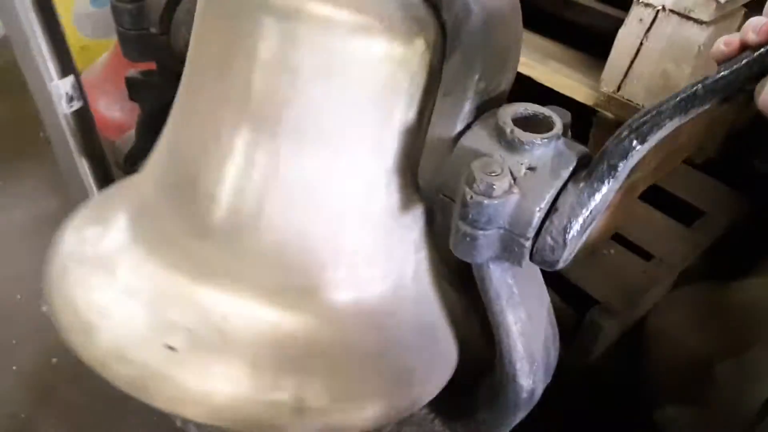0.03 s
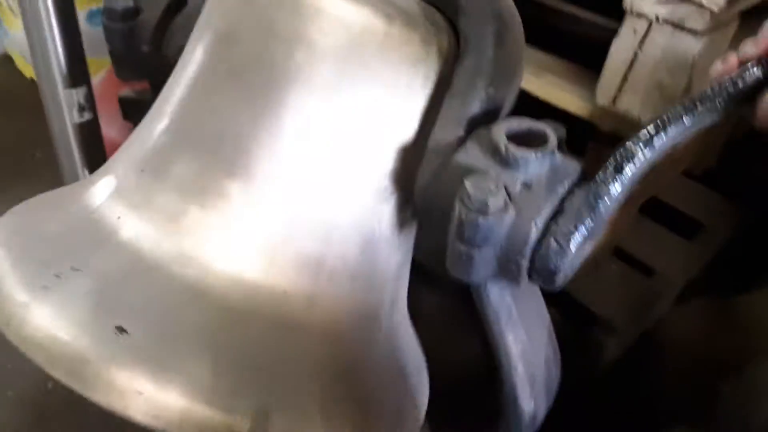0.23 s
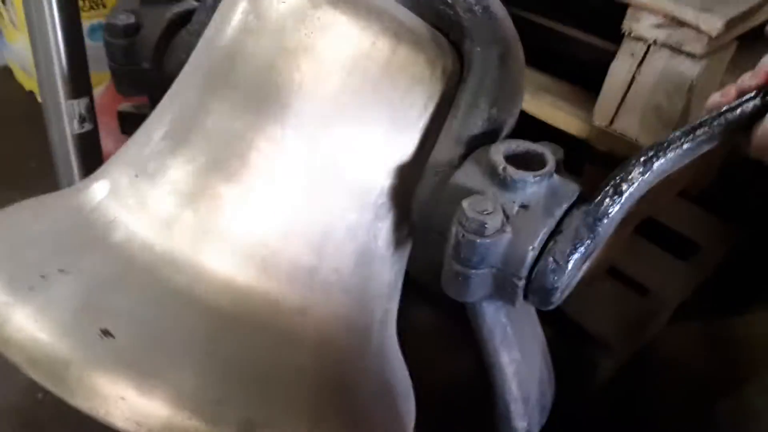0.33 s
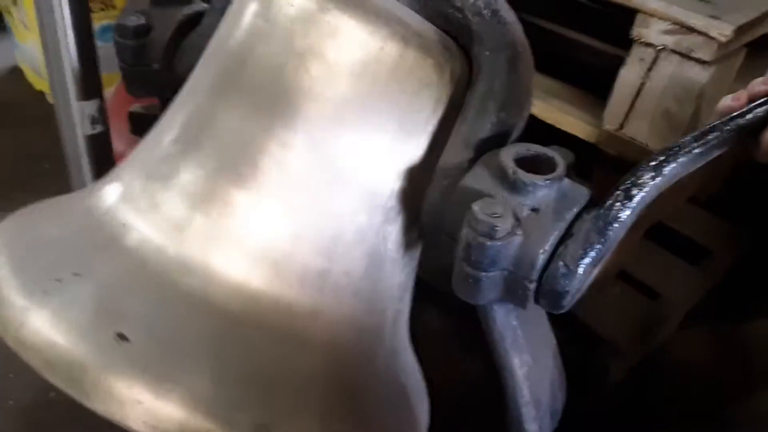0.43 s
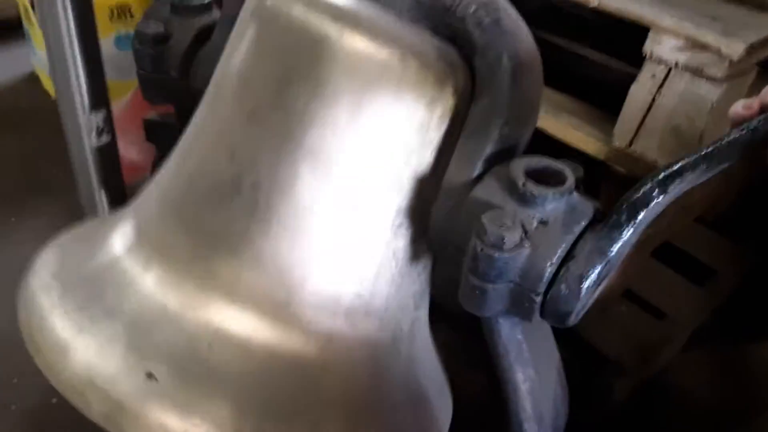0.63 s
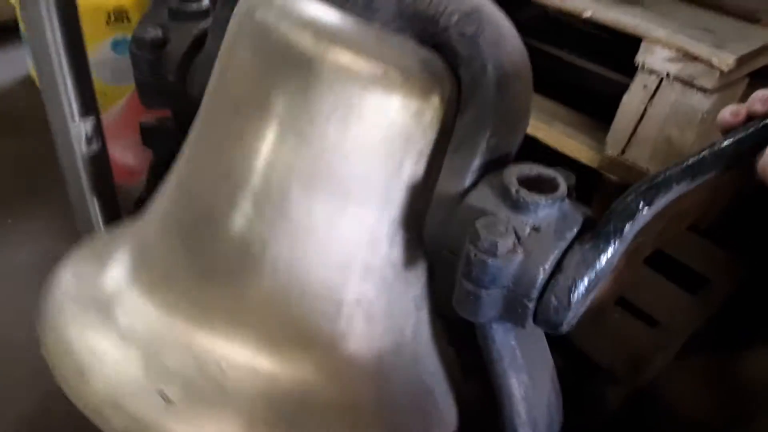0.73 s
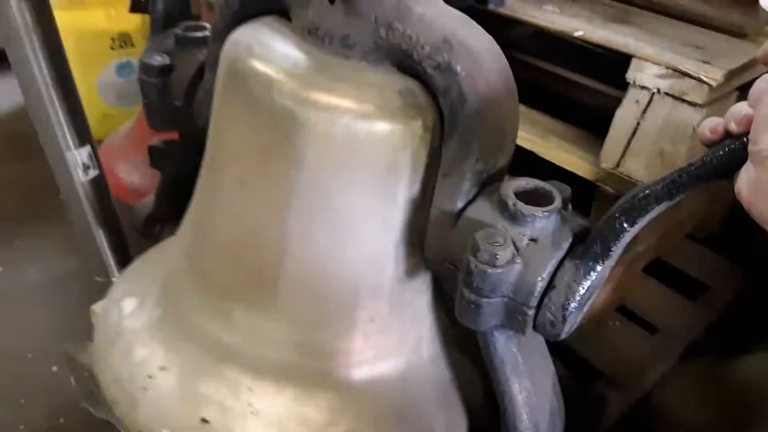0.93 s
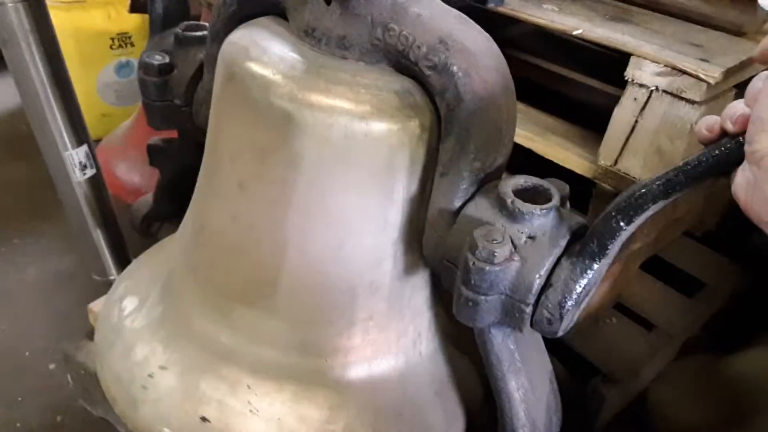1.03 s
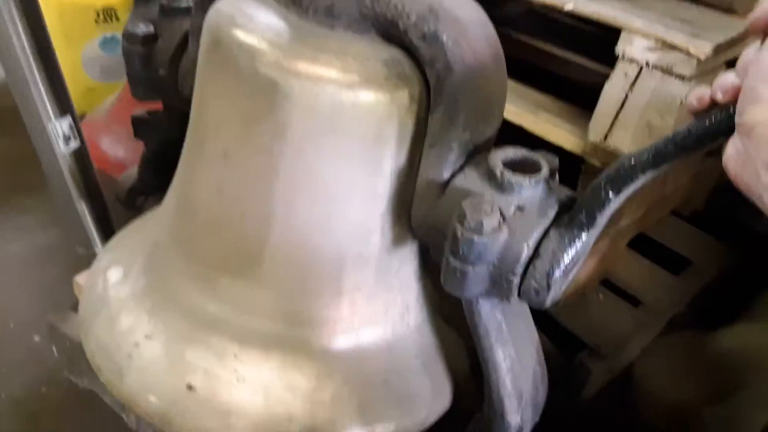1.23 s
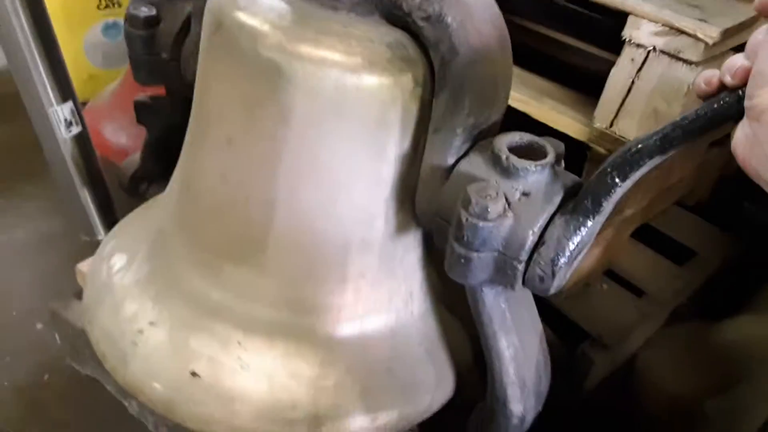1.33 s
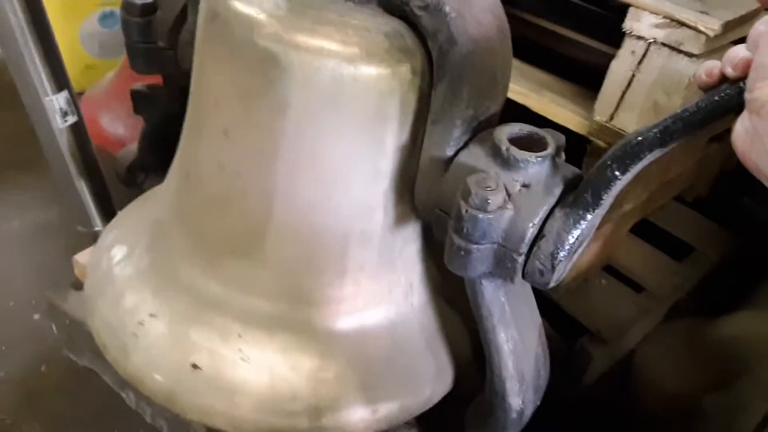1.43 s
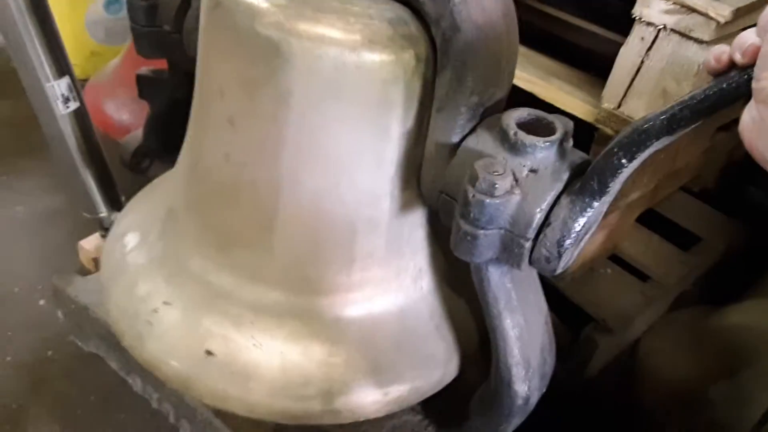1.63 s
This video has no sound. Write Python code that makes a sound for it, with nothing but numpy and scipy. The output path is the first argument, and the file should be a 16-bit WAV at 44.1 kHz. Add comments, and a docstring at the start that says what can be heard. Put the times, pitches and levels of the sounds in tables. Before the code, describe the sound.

A heavy brass bell is struck twice up close, ringing loudly with slowly beating metallic tones

```python
"""A brass bell rings twice, close by, with slow beats in its split partials and soft knocks after the second blow.
It swings in its yoke in a workshop: decaying partials beat, and the low ones swell as the mouth tilts up.
Each clapper blow adds a crack, a dense clang and a thud of the stand, all shaped from coloured noise.
A hand steadies the bell and the mount knocks softly, over a bed of workshop noise.
The first blow pulls the recorder's gain down and overloads the left channel."""
import sys
import numpy as np
from scipy import signal
from scipy.fft import rfft, irfft
from scipy.io import wavfile
from scipy.ndimage import uniform_filter1d, minimum_filter1d

SR = 44100
rng = np.random.default_rng(int(sys.argv[2]) if len(sys.argv) > 2 else 0)


def log_audio(samples):
    """Write samples as a 16-bit WAV file to the path given in sys.argv[1]."""
    # one column per channel
    frames = np.atleast_2d(samples).T
    # limit to full scale, then quantise
    limited = np.clip(frames, -1, 1)
    pcm = np.round(limited * 32767).astype(np.int16)
    wavfile.write(sys.argv[1], SR, pcm)


N = 74970
T = np.arange(N) / SR  # seconds
FREQS = np.fft.rfftfreq(N, 1 / SR)  # Hz


def amp(db):
    """Logarithmic level: 20 dB is a factor of ten in amplitude."""
    return 10 ** (np.asarray(db) / 20)


def read_log_hz(points, hz):
    """Logarithmic frequency scale: interpolates a table evenly per octave."""
    table_hz, value = np.transpose(points)
    return np.interp(np.log(hz + 1), np.log(table_hz + 1), value)


def read_time(points):
    """Piecewise-linear envelope: interpolates a table over the whole scene."""
    return np.interp(T, *np.transpose(points))


def pan(left_db):
    """Interchannel level difference: gains of left and right, left_db apart."""
    return amp(np.array([[0.5], [-0.5]]) * left_db)


CHANNEL_CORRELATION = 0.45  # of the two noise sources, 0-1
PATCH_HZ = 14  # spacing of the random peaks and dips in the spectrum


def noise(spectrum, patchy_db=0):
    """Spectral shaping: filters partly correlated stereo noise to rms 1; patches act as narrow resonances."""
    left, other = rng.standard_normal((2, N))
    right = CHANNEL_CORRELATION * left + np.sqrt(1 - CHANNEL_CORRELATION ** 2) * other
    patches = np.interp(FREQS / PATCH_HZ, np.arange(4096), rng.standard_normal(size=4096))
    shape = amp(read_log_hz(spectrum, FREQS) + patchy_db * patches)
    shaped = irfft(rfft([left, right]) * shape, N)
    return shaped / shaped.std()


ATTACK_S = 0.0008


def onset(start):
    """Finite contact time: an impact rises linearly from 0 to 1."""
    return np.clip((T - start) / ATTACK_S, 0, 1)


def decay(start, t60):
    """Exponential damping: amplitude falls 60 dB in t60 seconds."""
    return amp(-60 * np.maximum(T - start, 0) / t60)


def burst(start, db, spectrum, t60):
    """Impulsive excitation: coloured noise starts abruptly and dies away."""
    return amp(db) * onset(start) * decay(start, t60) * noise(spectrum)


# Workshop noise. Each row: frequency in Hz, relative spectral density in dB per Hz.
ROOM = [(18, -63), (30, -33.5), (92, -8), (205, -7.5), (253, -3), (448, -13), (859, -15.5), (928, -22),
        (1000, -21), (1970, -19), (2310, -26.5), (4310, -30.5), (15000, -61)]
ROOM_DB, ROOM_LEFT_DB = -70.5, 2.5  # level, left-right difference


def room():
    """Stationary noise: the workshop has a constant level and a fixed spectrum."""
    return amp(ROOM_DB) * pan(ROOM_LEFT_DB) * noise(ROOM)


# Soft knocks of the mount. Each row: start in seconds, body level in dB, tap level in dB.
KNOCKS = [(.868, -52, -65), (1.024, -48, -66.5), (1.163, -46, -45), (1.295, -55.5, -52)]
# Resonant body of a knock. Each row: frequency in Hz, relative spectral density in dB per Hz.
KNOCK_BODY = [(40, -31), (120, -15.5), (230, -15), (305, 6.5), (380, -16), (700, -31), (3000, -59)]
# Short contact tap of a knock. Each row: frequency in Hz, relative spectral density in dB per Hz.
KNOCK_TAP = [(60, -20), (200, -8), (650, 1.5), (1000, -9.5), (4000, -43)]
BODY_T60_S, TAP_T60_S = 0.23, 0.04


def knocks():
    """Impact and body resonance: the bell settles in its mount with short taps and longer dull bodies."""
    total = 0
    for start, body_db, tap_db in KNOCKS:
        total = total + burst(start, body_db, KNOCK_BODY, BODY_T60_S)
        total = total + burst(start, tap_db, KNOCK_TAP, TAP_T60_S)
    return total


# Dense ringing of clapper, yoke and room. Each row: frequency in Hz, relative spectral density in dB per Hz.
CLANG = [(60, -27.5), (150, -16), (350, -8), (650, -7.5), (1000, -2), (1600, -6), (2300, 0), (2750, -12.5),
         (3400, -1), (4500, -4), (6500, -14.5), (8000, -34.5), (15000, -51)]
# Damping of that ringing. Each row: frequency in Hz, 60 dB decay time in seconds.
CLANG_T60 = [(100, 1.1), (500, 1.8), (2000, 1.8), (5000, 0.65), (12000, 0.46)]
CLANG_PATCHY_DB = 6  # depth of the random resonances


def clang(start, db):
    """Frequency-dependent damping: each band of the dense ringing decays at its own rate, treble fastest."""
    hz, frame_s, bands = signal.stft(noise(CLANG, CLANG_PATCHY_DB), SR, nperseg=512)
    band_t60 = read_log_hz(CLANG_T60, hz)[:, None]
    fall = amp(-60 * np.maximum(frame_s - start, 0) / band_t60)
    ringing = signal.istft(bands * fall, SR, nperseg=512)[1][:, :N]
    return amp(db) * onset(start) * ringing


# Clapper blows, which also start the partials.
# Each row: start in seconds, clang level in dB, crack level in dB, thud level in dB,
# damping as a factor that divides the decay times of the partials.
STRIKES = [(0.2233, -32, -21, -37, 0.81), (0.7683, -43.5, -19, -54, 1.37)]
# Crack of the clapper. Each row: frequency in Hz, relative spectral density in dB per Hz.
CRACK = [(100, -24), (700, -11.5), (1500, 0.5), (2500, -3.5), (4200, -4), (6500, -27), (9000, -48),
         (15000, -57)]
# Thud of the stand. Each row: frequency in Hz, relative spectral density in dB per Hz.
THUD = [(25, -19.5), (70, -22.5), (125, -6), (200, -12), (330, -1), (700, -20), (3000, -58.5)]
CRACK_T60_S, THUD_T60_S = 0.13, 1


def blows():
    """Broadband impact: each blow sounds the clapper's crack, the clang and the thud of the stand."""
    total = 0
    for start, clang_db, crack_db, thud_db, _ in STRIKES:
        total = total + clang(start, clang_db)
        total = total + burst(start, crack_db, CRACK, CRACK_T60_S)
        total = total + burst(start, thud_db, THUD, THUD_T60_S)
    return pan(left_db=5) * total


WAVER_HZ, WAVER_SLOPE = 5.9, 1.35  # corner and steepness of the waver's low-pass


def waver():
    """Random modulation: slow complex noise of rms 1, independent in each channel."""
    hz = np.fft.fftfreq(N, 1 / SR)
    real, imaginary = rng.standard_normal((2, 2, N))
    lowpass = (abs(hz) < 150) / (1 + (hz / WAVER_HZ) ** 2) ** (WAVER_SLOPE / 2)
    slow = np.fft.ifft((real + 1j * imaginary) * lowpass)
    return slow / slow.std()


# Swell of the partials as the bell swings. Each row: time in seconds, level in dB at full share.
SWING = [(.22, -12), (.31, -10), (.41, -2.5), (.52, 3.5), (.61, 4), (.74, -6), (.8, -4), (1.0, -3.5),
         (1.18, -3), (1.45, -13), (1.58, -2.5), (1.7, -3.5)]
# How far a mode follows the swing. Each row: frequency in Hz, share as a factor on the swing's dB.
SWING_SHARE = [(450, 0.61), (950, 1.0), (1500, 0.47), (2200, 0.12), (3100, 0.069), (4000, 0.065),
               (9000, .1)]
# Reflections shift as the bell moves. Each row: frequency in Hz, rms waver depth relative to the partial.
WAVER = [(450, 0.073), (950, .15), (1500, .15), (2200, 0.13), (3100, .13), (4100, .16), (5200, 0.32),
         (9000, 1)]
# Phase between the channels. Each row: frequency in Hz, lead of the left channel in radians.
PORT_PHASE = [(467, .8), (924, 0.93), (958, -1.1), (1500, 1.08), (2222, 1.24), (3097, -1), (4097, -1.56),
              (5197, 1.9), (9000, 1.5)]
# The bell moves across the microphone. Each row: time in seconds, added left-right difference in dB.
DRIFT = [(.22, 2.5), (.35, 2), (.52, -3), (.78, -1), (1.1, -2.5), (1.4, 0), (1.7, -0.5)]
# Bell modes. Each row: frequency in Hz, level after the first blow in dB, level after the second in dB
# (both before the swing), 60 dB decay time in seconds before damping, left-right difference in dB before
# drift; split modes add: beat rate in Hz, signed beat depth as a ratio, and for each blow the time in
# seconds of a beat trough (a peak if the depth is negative).
MODES = [ (467.5, -26.5, -36, 5.5, 4.5), (769.5, -49, -57.5, 6, -1), (924, -15, -22, 4, 2),
         (958, -16.5, -29, 9, -3, 2.63, 0.24, -0.5, 0.9), (1488, -15.5, -12, 0.84, 3),
         (1501.5, -7.5, -16, 3, 5, 3.0, 0.4249, 0.36, 1.43), (1668, -36.5, -28.5, 0.78, -1.5),
         (2222, -4.5, -10.5, 1.65, 5.5, 3.0, .27, 0.39, .98), (2365, -49.5, -30, 0.88, -2),
         (2483, -36.5, -41.5, 1.04, 1), (2524.5, -47.5, -35, 1, 2),
         (3098.5, -14.5, -20.5, 2.05, 1, 5.4, .85, .595, 1.11), (3353.5, -24.5, -30, 1.12, -0.5),
         (3408, -28.5, -33.5, 1.07, -2), (3568.5, -42, -43.5, .8, 1), (3744.5, -43.5, -47.5, .8, -0.5),
         (3972, -41, -32.5, 0.92, 0), (4098.5, -18.5, -22, 1.7, 7, 3.1, .35, .74, 1.06),
         (4157.5, -35, -31.5, 0.64, 1), (4477.5, -34.5, -47.5, 1.1, 7), (4635, -44.5, -44, 1.02, -1.5),
         (4696, -46, -45, 1.14, 0), (4758.5, -34.5, -48.5, 1.0, 1.5), (5012, -56.5, -53, 1.9, -0.5),
         (5195, -22, -33, 1.5, 4, 3.3, .45, .37, .86), (5655.5, -42.5, -55, 1.25, 7),
         (5848, -48, -48, 0.9, 2), (6173.5, -52.5, -51.5, 1.1, -3.5), (6313, -45.5, -48, 1.08, 5),
         (6370.5, -32, -44.5, 1.16, -1.5, 17, -0.1, 1.2, 2.1), (6939.5, -53, -65, 0.9, 1),
         (7628.5, -45, -56, 1.0, -3.5, 14.5, 1, .49, 2.9), (8340, -62, -77.5, 0.6, 0),
         (8934, -64, -71, 1.1, -1)]


def mode(hz, first_db, second_db, t60, left_db, beat_hz=0, depth=0, first_trough=0, second_trough=0):
    """Modal decay and beating: each blow resets a partial and its twin, and the swing swells them."""
    ring = np.zeros(N, complex)
    levels, troughs = (first_db, second_db), (first_trough, second_trough)
    for (start, *_, damping), db, trough in zip(STRIKES, levels, troughs):
        # the twin lies beat_hz below the partial
        beat = 1 - depth * np.exp(2j * np.pi * beat_hz * (trough - T))
        new_ring = amp(db) * decay(start, t60 / damping) * beat
        ring += onset(start) * (new_ring - ring)  # the blow replaces the earlier ringing
    swing = amp(read_log_hz(SWING_SHARE, hz) * read_time(SWING))
    channel_lag = np.array([[0], [1]]) * read_log_hz(PORT_PHASE, hz)
    angle = 2 * np.pi * hz * (T - STRIKES[0][0]) - channel_lag
    tone = ring * np.exp(1j * angle) * (1 + read_log_hz(WAVER, hz) * waver())
    return pan(left_db + read_time(DRIFT)) * swing * tone.imag


def bell():
    """Modal superposition: the bell's tone is the sum of its partials."""
    return sum(mode(*row) for row in MODES)


def scene():
    """Linear superposition: workshop noise, knocks, blows and bell add as pressures."""
    return room() + knocks() + blows() + bell()


IDLE_GAIN_DB, TARGET_DB = 28, -4.5  # largest gain, short-term power aimed for
HELD_RISE_DB_PER_S = 0.06  # the held level creeps up, so the gain creeps down
OVERSHOOT_DB, SETTLE_S = 2.5, 0.048  # extra gain at most after a jump, its time constant
LIMIT_DB, LIMIT_RECOVER_DB_PER_S = -1.1, 30
CLIP_LEVEL, EDGE_HZ = 0.92, 15700  # full scale is 1; low-pass cutoff


def record(dry):
    """Dynamic compression: gain drops at once and settles further; peaks clip until a limiter holds them."""
    power_db = 10 * np.log10(abs(uniform_filter1d((dry ** 2).mean(0), size=200)) + 1e-12)
    creep_db = T * HELD_RISE_DB_PER_S
    held_db = np.maximum.accumulate(power_db - creep_db) + creep_db
    # each jump of the held level leaves a lag that fades away
    r = np.exp(-1 / (SETTLE_S * SR))
    lag_db = signal.lfilter([r, -r], [1, -r], held_db - held_db[0])
    gain_db = np.minimum(IDLE_GAIN_DB, TARGET_DB - held_db + np.minimum(lag_db, OVERSHOOT_DB))
    # the lag also loosens the limiter
    release_db = T * LIMIT_RECOVER_DB_PER_S
    peak_db = 20 * np.log10(abs(dry).max(0) + 1e-9)
    held_peak_db = np.maximum.accumulate(peak_db + release_db) - release_db
    limit_gain_db = LIMIT_DB - held_peak_db + np.maximum(lag_db, 0)
    gain_db = minimum_filter1d(np.minimum(gain_db, limit_gain_db), size=41)
    smooth_gain = amp(uniform_filter1d(gain_db, size=40))
    clipped = np.clip(dry * smooth_gain, -CLIP_LEVEL, CLIP_LEVEL)
    lowpass = signal.firwin(511, EDGE_HZ, window=("kaiser", 9), fs=SR)
    return signal.oaconvolve(clipped, lowpass[None], "same")


dry = scene()
out = record(dry)
log_audio(out)
```